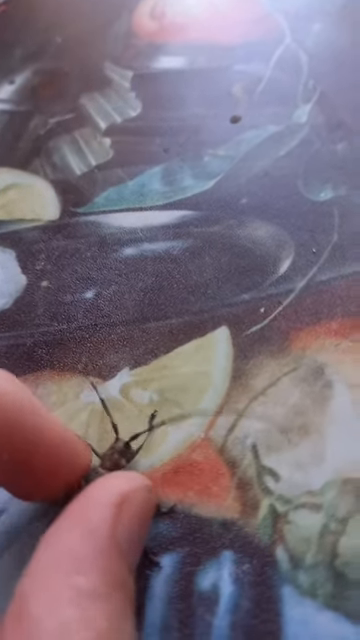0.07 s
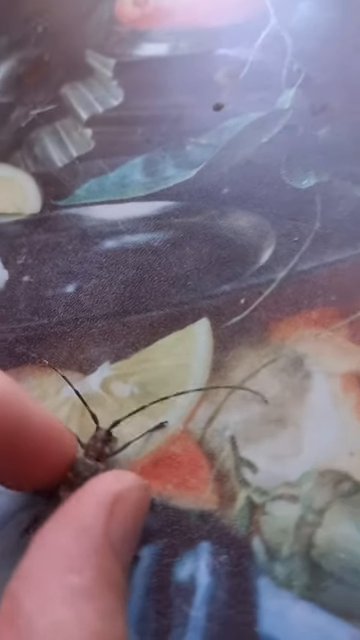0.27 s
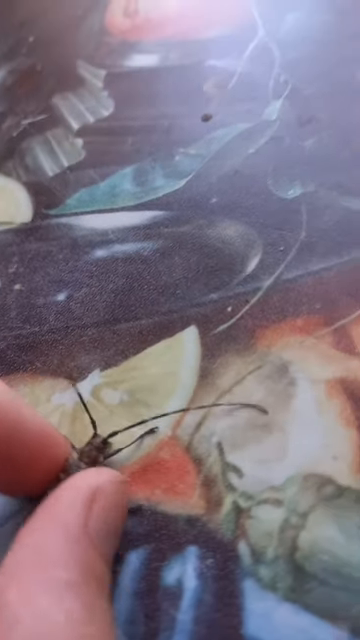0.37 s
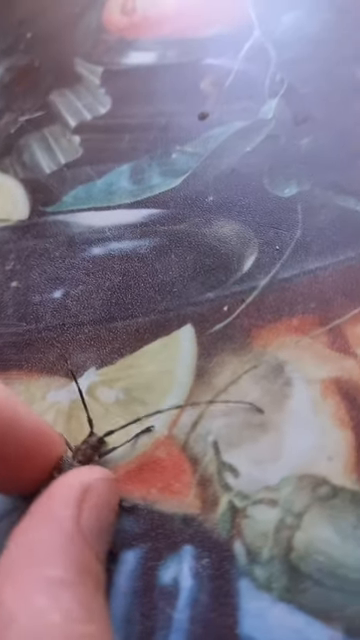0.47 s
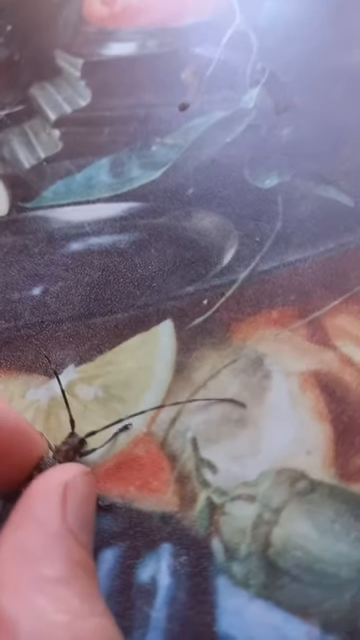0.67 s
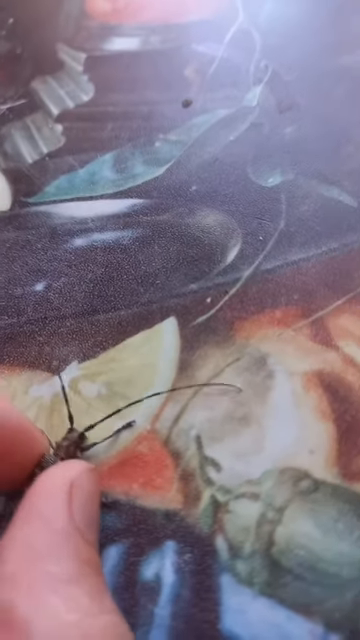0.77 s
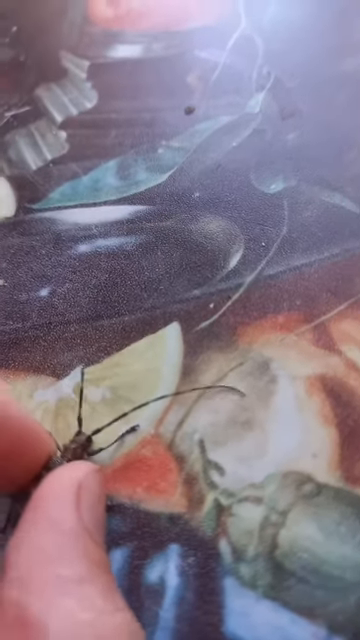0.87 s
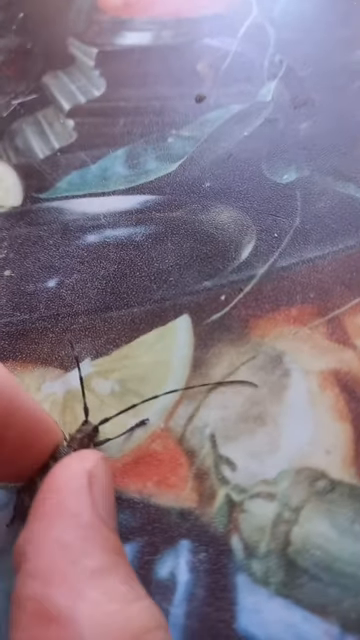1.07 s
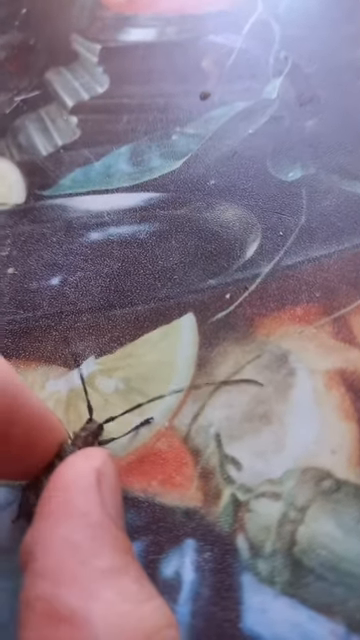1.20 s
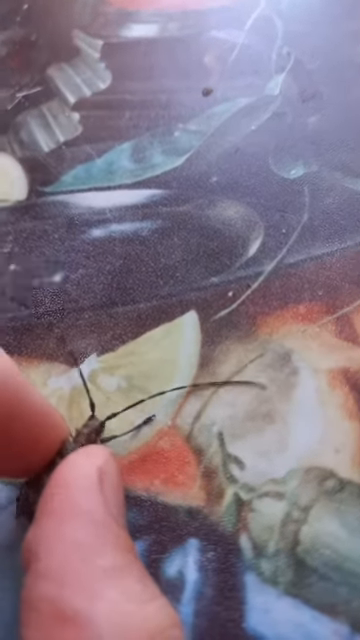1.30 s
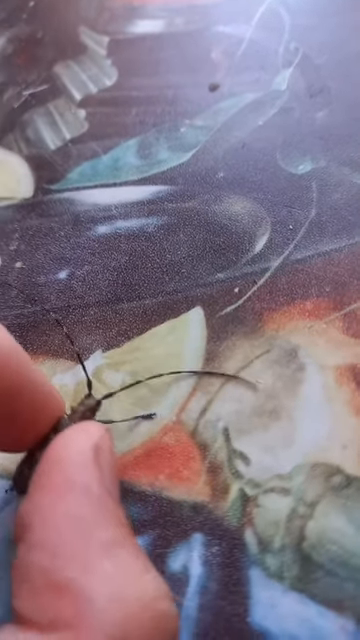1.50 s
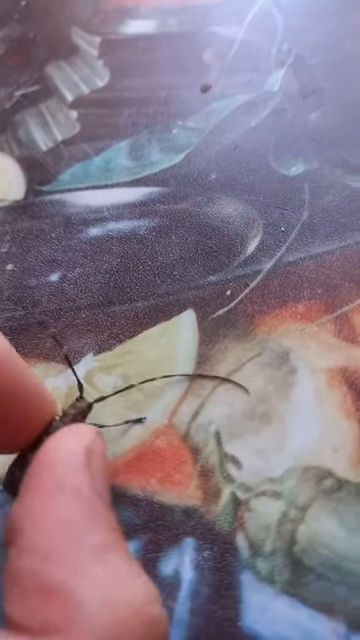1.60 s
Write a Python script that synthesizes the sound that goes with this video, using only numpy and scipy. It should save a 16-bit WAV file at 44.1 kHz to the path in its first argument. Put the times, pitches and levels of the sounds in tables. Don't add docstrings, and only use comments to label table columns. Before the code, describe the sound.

Pinched beetle chirps in uneven scrapes, quick squeaks and dry clicks, close up, loudest early on

```python
import sys
import numpy as np
from scipy import signal
from scipy.fft import rfft, irfft
from scipy.io import wavfile
from scipy.ndimage import uniform_filter1d

SR = 44100
rng = np.random.default_rng(int(sys.argv[2]) if len(sys.argv) > 2 else 0)


def wrap_up_sound(samples):
    columns = np.atleast_2d(samples).T
    tamed = np.clip(columns, -1, 1)
    steps = np.round(tamed * 32767).astype(np.int16)
    wavfile.write(sys.argv[1], SR, steps)


def convert_level_to_amplitude(level_db):
    exponent = np.asarray(level_db, float) / 20
    return 10 ** exponent


N = 72765
TOP_CUT_HZ = 6840
BASS_CUT_HZ, RETURN_CUT_HZ, TICK_CUT_HZ = 1450, 1350, 1750


def rms_one(x):
    return x / np.sqrt(np.mean(x ** 2) + 1e-20)


def coloured(spectrum):
    hz = np.arange(N // 2 + 1) * SR / N + 1e-3
    point_hz, point_db = np.transpose(spectrum)
    gain = convert_level_to_amplitude(np.interp(np.log(hz), np.log(point_hz), point_db, left=-200, right=-200))
    return rms_one(irfft(rfft(rng.standard_normal((2, N))) * gain, N))


# pitch_hz, density_db (per Hz)
AIR_SPECTRUM = [(25, -19), (60, -15), (190, -5.5), (900, -17), (1500, -15.5), (2400, -2.5), (3200, -28.5),
                (6300, -18.5)]


def room_air():
    level_db = -60 + np.array([[0], [-2.5]])
    return convert_level_to_amplitude(level_db) * coloured(AIR_SPECTRUM + [(TOP_CUT_HZ, -30)])


# pitch_hz, density_db (per Hz)
WHINE_SPECTRUM = [(9200, -10.5), (14300, -16), (15200, 8.5), (15700, -1.5)]


def high_whine():
    level_db = -79 + np.array([[3.0], [-17.5]])
    return convert_level_to_amplitude(level_db) * coloured(WHINE_SPECTRUM)


# start_s (swell centre), level_db
RUMBLE_SWELLS = [
    (.16, -54),
    (.295, -51),
    (0.469, -60),
    (0.788, -59),
    (1.219, -62.5),
    (1.47, -62.5),
]


def hand_rumble():
    centre_hz, wide_hz, steady_db, swell_s = 79.6, 32.8, -65.5, 0.04
    t = np.arange(N) / SR
    swell = convert_level_to_amplitude(steady_db)
    for start_s, level_db in RUMBLE_SWELLS:
        swell = swell + convert_level_to_amplitude(level_db) * np.exp(-((t - start_s) / swell_s) ** 2)
    return swell * coloured([(centre_hz - wide_hz, -20), (centre_hz, 0), (centre_hz + 2 * wide_hz, -16)])


def clicks(s, size):
    over = 4
    fine = np.zeros(over * N + 2)
    at = np.clip(s * SR * over, 0, over * N)
    k = at.astype(int)
    np.add.at(fine, k, size * (1 - at + k))
    np.add.at(fine, k + 1, size * (at - k))
    return over * signal.resample_poly(fine[:over * N], 1, over) + 1e-18


def stroke(rows, jitter):
    wobble, wobble_ridges = 0.07, 8
    spread_db, slow_spread_db, slow_hz = 1.5, 0.8, 500
    s, hz, db = np.transpose(rows)
    t = np.arange(s[0], s[-1], 1 / SR)
    rate = np.exp(np.interp(t, s, np.log(hz)))
    passed = np.cumsum(rate) / SR
    luck = rng.standard_normal((250, 3))[:int(passed[-1]) + 1]
    drift = uniform_filter1d(uniform_filter1d(luck[:, 2], wobble_ridges), wobble_ridges)
    slip = wobble * wobble_ridges ** .5 * drift
    even = np.interp(np.arange(len(luck)), passed, t)
    ridge_rate = np.interp(even, t, rate)
    weak = np.minimum(convert_level_to_amplitude((db.max() - np.interp(even, s, db)) / 2), 3)
    at = even + (jitter * weak * luck[:, 0] + slip) / ridge_rate
    slow_db = slow_spread_db / (1 + (ridge_rate / slow_hz) ** 2)
    uneven_db = spread_db * (1 + 10 * jitter) / 2 + slow_db
    return at, convert_level_to_amplitude(np.interp(at, s, db) + uneven_db * np.clip(luck[:, 1], -2, 1))


def body(hits, modes):
    out = np.zeros((2, N))
    for hz, left_db, right_db, t60_s in modes:
        r, w = convert_level_to_amplitude(-60 / (t60_s * SR)), 2 * np.pi * hz / SR
        ring = signal.lfilter([0, np.sin(w)], [1, -2 * r * np.cos(w), r * r], hits)
        out += convert_level_to_amplitude(np.array([[left_db], [right_db]])) * ring
    return out


def rasp(strokes, upper_db, modes, cut_hz):
    upper_from_hz = 3000
    upper = np.hstack([(s, a * convert_level_to_amplitude(d)) for (s, a), d in zip(strokes, upper_db)])
    out = body(clicks(*np.hstack(strokes)), [m for m in modes if m[0] < upper_from_hz])
    out = out + body(clicks(*upper), [m for m in modes if m[0] >= upper_from_hz])
    return signal.sosfiltfilt(signal.butter(4, cut_hz, "high", fs=SR, output="sos"), out) / 2


# start_s, ridge_rate_hz, level_db (of the clicks)
FORWARD_EARLY = [
    [(.001, 1289, -47.5), (.012, 1209, -51), (.02, 1187, -44.5), (.03, 988, -53), (.05, 793, -29),
     (.075, 932, -36), (.095, 784, -31), (.105, 904, -44.5), (.185, 910, -48)],
    [(.2255, 1882, -14), (.231, 2148, -24.5), (.241, 2038, -16.5), (.248, 1288, -16.5), (.255, 1074, -14),
     (.2625, 890, -12.5)],
    [(.274, 1950, -37.5), (.282, 2103, -20), (.287, 1810, -18), (.294, 2159, -24), (.302, 1970, -18.5),
     (.31, 1223, -23), (.336, 1106, -13.5), (.346, 588, -16.5), (.3705, 581, -13.5)],
    [(.463, 761.3, -15.5), (.47, 1196, -23.5), (.484, 1239, -22), (.488, 730, -24.5), (.5, 804.5, -22),
     (.515, 544.4, -22), (.545, 381.3, -21), (.56, 368.2, -24.5), (.574, 192.8, -18.5)],
]
FORWARD_LATE = [
    [(.758, 903, -43), (.772, 629.2, -27), (.79, 282, -28.5), (.803, 270.7, -27), (.816, 500, -24),
     (.83, 954, -25), (.85, 664, -24.5), (.862, 325, -23), (.886, 219.7, -26)],
    [(.9605, 192.4, -34), (.975, 372.5, -28), (.99, 528, -22.5), (1.003, 813, -26), (1.01, 448, -19.5),
     (1.0215, 299, -20.5)],
    [(1.122, 1000, -51), (1.132, 1150, -43), (1.142, 1580, -42)],
    [(1.1505, 357.6, -23.5), (1.163, 238, -30), (1.176, 449.7, -24.5), (1.21, 475.6, -21.5),
     (1.224, 767.4, -23.5), (1.236, 813, -21), (1.243, 965.5, -22), (1.2525, 269, -24.5)],
]
FORWARD_FAINT = [
    [(1.358, 1148, -50), (1.366, 1272, -47), (1.374, 1373, -78), (1.382, 1342, -41.5), (1.394, 1040, -41.5),
     (1.398, 793, -57), (1.41, 814, -37), (1.428, 714, -45)],
    [(1.5, 1014, -46.5), (1.54, 970, -58.5), (1.58, 1141, -57), (1.61, 1000, -57), (1.65, 1190, -56.5)],
]
FORWARD_JITTER = [0.36, 0.043, .045, 0.06, 0.039, 0.049, 0.063, 0.028, 0.032, 0.049]
FORWARD_UPPER_DB = [2, -8, -8.5, -4.5, -9.5, -1.5, -2, 0, -1.5, -7]
# pitch_hz, left_db, right_db, t60_s
FORWARD_BODY = [(1650, -7, -40.5, .006), (2130, -9.5, -29.5, 0.017), (2470, 3.5, -7.5, 0.0056),
                (3656, 0.5, -8, 0.003), (4950, -9, -3, 0.00098), (6050, -18.5, -22, 0.001)]
FAINT_BODY = [(1950, -2.5, -20, 0.018), (2380, 1, -32, 0.013), (3530, -33, -14, 0.0033),
              (6300, -4, -15, 0.0044)]


def forward_rasps():
    rows = FORWARD_EARLY + FORWARD_LATE + FORWARD_FAINT
    strokes = [stroke(r, j) for r, j in zip(rows, FORWARD_JITTER)]
    firm = rasp(strokes[:8], FORWARD_UPPER_DB[:8], FORWARD_BODY, BASS_CUT_HZ)
    return firm + rasp(strokes[8:], FORWARD_UPPER_DB[8:], FAINT_BODY, BASS_CUT_HZ)


# start_s, level_db
STALL_TICKS = [(0.1196, -26.5), (0.1702, -31), (0.5924, -34), (0.5953, -19), (0.6016, -25), (0.6086, -19),
               (0.6153, -21), (0.62, -20), (0.6224, -22.5), (0.6263, -17), (0.6308, -19.5), (0.6359, -22),
               (0.6383, -16), (0.6423, -25.5), (0.65, -15.5), (0.6822, -23), (0.77, -17), (0.893, -24.5),
               (0.9146, -38), (0.937, -37), (0.9514, -30.5), (1.146, -18.5)]


def stalled_ridges():
    start_s, level_db = np.transpose(STALL_TICKS)
    ticks = (start_s - 3 / SR, convert_level_to_amplitude(level_db))
    return rasp([ticks], [-4], FORWARD_BODY, TICK_CUT_HZ)


# start_s, level_db, t60_s
KNOCKS = [
    (0.132, -43, 0.4),
    (0.165, -46, 0.43),
]
# pitch_hz, density_db (per Hz)
KNOCK_SPECTRUM = [(50, -19), (100, -7.5), (250, -9.5), (1000, -32.5), (3000, -33.5)]


def finger_knocks():
    left_db = -19
    t = np.arange(N) / SR
    shape = np.zeros(N)
    for start_s, level_db, t60_s in KNOCKS:
        attack = np.clip(300 * (t - start_s), 0, 1)
        shape += convert_level_to_amplitude(level_db - 60 * np.abs(t - start_s) / t60_s) * attack
    return shape * coloured(KNOCK_SPECTRUM) * convert_level_to_amplitude(np.array([[left_db], [0]]))


# start_s, ridge_rate_hz, level_db (of the clicks)
RETURN_EARLY = [
    [(.188, 1430, -52), (.196, 1700, -42.5), (.202, 1847, -37), (.222, 1800, -42)],
    [(.379, 1213, -14), (.385, 1926, -13.5), (.398, 1903, -11.5), (.408, 2028, -12.5), (.422, 2054, -12),
     (.431, 1394, -16.5), (.438, 773, -17.5), (.4465, 584, -15.5)],
    [(.6788, 1208, -19.5), (.686, 1287, -42), (.692, 1700, -28), (.7, 1700, -31), (.718, 1814, -36),
     (.728, 1389, -43), (.738, 1111, -38), (.755, 1027, -48.5)],
]
RETURN_LATE = [
    [(1.0368, 897, -18.5), (1.041, 1005, -17.5), (1.047, 1615, -17.5), (1.062, 1647, -20.5),
     (1.072, 1707, -30.5), (1.085, 1665, -36.5), (1.097, 1650, -39.5), (1.104, 1270, -39.5)],
    [(1.262, 1130, -44), (1.272, 1454, -31.5), (1.279, 1632, -30.5), (1.295, 1659, -27.5),
     (1.31, 1675, -33), (1.325, 1674, -35.5), (1.331, 1423, -36.5), (1.34, 1270, -49)],
    [(1.433, 1210, -34), (1.44, 1540, -39.5), (1.45, 1740, -31), (1.462, 1650, -33.5), (1.472, 1767, -37),
     (1.488, 1810, -42.5), (1.5, 1680, -49)],
]
RETURN_JITTER = [.02, .024, .026, .016, .024, .022]


def return_strokes():
    return [stroke(r, j) for r, j in zip(RETURN_EARLY + RETURN_LATE, RETURN_JITTER)]


RETURN_UPPER_DB = [3, -2, -4, -2, -3, 2]
# pitch_hz, left_db, right_db, t60_s
RETURN_BODY = [(1700, -29.5, -30.5, 0.0022), (2580, 5.5, -8, 0.0051), (3800, 4.5, -4, 0.0022),
               (4260, -1.5, -4, 0.0015), (5650, -2, -4, 0.002)]
SOFT_BODY = [(1752, -9, -17.5, 0.01), (2460, -1, -15.5, 0.015), (3670, -6, -20, 0.0023),
             (4800, -13, -14, 0.00092), (6220, -3, -11, 0.0028)]


def return_squeaks(strokes):
    firm = rasp(strokes[:4], RETURN_UPPER_DB[:4], RETURN_BODY, RETURN_CUT_HZ)
    return -(firm + rasp(strokes[4:], RETURN_UPPER_DB[4:], SOFT_BODY, RETURN_CUT_HZ))


EDGE_DB = [-56, -43.5, -25.5, -27.5, -14, -18.5]
EDGE_FADE = [4, -0.5, 114, 192, 211, 194]
SHRILL_DB = [8, -16, -13, -7, -2.5, -4]
# pitch_hz, left_db, right_db, t60_s
EDGE_BODY = [(9800, 11.6, -31, 0.0049), (12300, 10, -31.5, 0.001)]
SHRILL_BODY = [(15300, 19.3, -7.5, .004)]


def bright_edge(strokes):
    full_speed_hz, speed_power = 1904, 6.5
    fast = []
    for (s, a), level_db, fade in zip(strokes, EDGE_DB, EDGE_FADE):
        spacing = uniform_filter1d(np.gradient(s), size=5) * full_speed_hz + 1e-3
        fast.append((s, a * convert_level_to_amplitude(level_db - fade * (s - s[0])) * spacing ** -speed_power))
    shrill = [(s, a * convert_level_to_amplitude(d)) for (s, a), d in zip(fast, SHRILL_DB)]
    edge = body(clicks(*np.hstack(fast)), EDGE_BODY) + body(clicks(*np.hstack(shrill)), SHRILL_BODY)
    return signal.sosfilt(signal.cheby2(8, 50, [9300, 16000], "band", fs=SR, output="sos"), edge)


def right_path(x):
    lag_s, turn_rad = 0.00025, 2.455
    hz = np.arange(N // 2 + 1) * SR / N
    x[1] = irfft(rfft(x[1]) * np.exp(1j * (turn_rad - 2 * np.pi * hz * lag_s)), N)
    return x


def table_top(x):
    level_db, t60_s, gap_s = -12, 0.07, 0.0012
    t = np.arange(SR // 5) / SR
    tail = rng.standard_normal((2, len(t))) * convert_level_to_amplitude(-60 * t / t60_s) * (t > gap_s)
    tail /= np.sqrt(np.sum(tail ** 2, axis=1, keepdims=True))
    return convert_level_to_amplitude(level_db) * signal.fftconvolve(x, tail, axes=1)[:, :N]


def scene():
    forward = forward_rasps() + stalled_ridges()
    back = return_strokes()
    beetle = right_path(forward + return_squeaks(back))
    beetle = beetle + table_top(beetle)
    beetle = signal.sosfiltfilt(signal.butter(14, TOP_CUT_HZ, fs=SR, output="sos"), beetle)
    hand = hand_rumble() + finger_knocks()
    return beetle + bright_edge(back) + hand + room_air() + high_whine()


def top_cut(x):
    return signal.sosfilt(signal.butter(12, 16260, fs=SR, output="sos"), x)


def record(dry):
    return top_cut(dry)


dry = scene()
out = record(dry)
wrap_up_sound(out)
```